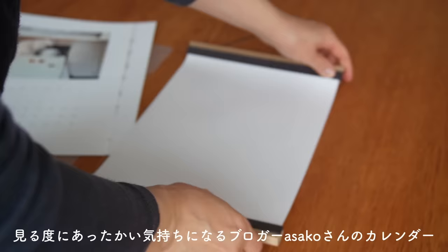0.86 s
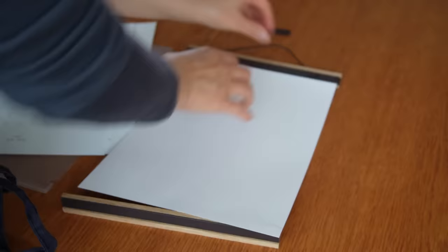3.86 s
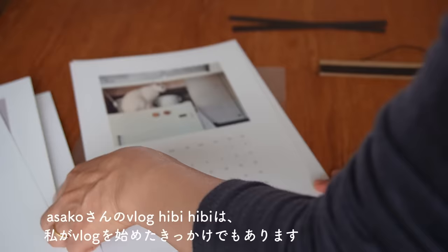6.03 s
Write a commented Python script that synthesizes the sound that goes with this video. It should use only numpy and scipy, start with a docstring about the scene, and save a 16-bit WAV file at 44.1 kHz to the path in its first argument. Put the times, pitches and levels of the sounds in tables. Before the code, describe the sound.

Paper sheets rustle, snap and slide on a wooden table while thin wooden bars knock against it, over a faint hum.

```python
"""A wooden table in a small, fairly live room; one microphone close by, an appliance humming faintly.
Calendar sheets are sorted and fitted between the thin wooden bars of a hanging frame. First the bars
drag and knock on the table; weight thuds down near 1 s and again at 3 s, with sheets brushing between.
From about 3 to 6 s the paper snaps as it flexes and crinkles in the grip, among further knocks.
In the last three seconds loose sheets slide across the table, edges scrape and a finger judders."""
import sys
import numpy as np
from scipy import signal
from scipy.fft import rfft, irfft, next_fast_len
from scipy.io import wavfile

SR = 44100
rng = np.random.default_rng(int(sys.argv[2]) if len(sys.argv) > 2 else 0)


def dump(signal):
    """Clip the signal to [-1, 1] and save it as 16-bit WAV at the path in sys.argv[1]."""
    limited = np.clip(np.atleast_2d(signal).T, -1, 1)
    pcm = np.round(limited * 32767).astype(np.int16)
    wavfile.write(sys.argv[1], SR, pcm)


N = 408366
TIME = np.arange(N) / SR
HIT_TIME = TIME[:SR // 10]
CUTOFF_HZ = 16000


def from_db(db):
    """Decibels to gain."""
    return 10 ** (np.asarray(db) / 20)


def rms_one(x):
    """Scale to unit rms."""
    return x / np.sqrt(np.mean(x ** 2) + 1e-20)


def at_hz(points, hz):
    """Read a table on a log-frequency axis."""
    freq_hz, value = np.transpose(points)
    return np.interp(np.log(hz + 1e-9), np.log(freq_hz), value)


def coloured(x, spectrum, unit_hz=1):
    """Give a signal a spectrum, at unit rms."""
    size = next_fast_len(len(x))
    hz = np.arange(size // 2 + 1) * SR / size
    gain = from_db(at_hz(spectrum, hz / unit_hz))
    return rms_one(irfft(rfft(x, size) * gain, size)[:len(x)])


def drift(per_s, size=N):
    """A randomly wandering curve of unit rms."""
    return rms_one(np.interp(TIME[:size] * per_s, np.arange(4096), rng.standard_normal(4096)))


def cut(x, hz, kind, order=2):
    """Low- or high-pass."""
    return signal.sosfilt(signal.butter(order, np.clip(hz, 10, .45 * SR), kind, fs=SR, output="sos"), x)


def resonance(x, hz, t60):
    """A two-pole resonance with gain 1 at its peak."""
    radius = np.exp(-np.log(1000) / (t60 * SR))
    feedback = [1, -2 * radius * np.cos(2 * np.pi * hz / SR), radius ** 2]
    return signal.lfilter(np.array([1, 0, -1]) * (1 - radius ** 2) / 2, feedback, x)


# Room air at the microphone: freq_hz, relative_db
AIR_SPECTRUM = [(25, -17.5), (45, -9), (85, -4.5), (180, -1.5), (400, -2.5), (620, -3), (850, -11),
                (1600, -15), (1900, -11.5), (2150, -23.5), (2500, -20.5), (4000, -29), (7000, -34),
                (15000, -33)]
# Tones of the appliance: pitch_hz, level_db
HUM_TONES = [(82, -72), (328.6, -64.5), (532.9, -80.5)]


def background(air_db=-56.5, waver_db=2.5, waver_rad=.7):
    """Room air and an appliance hum that wavers in pitch and level."""
    hum = np.zeros(N)
    for hz, level_db in HUM_TONES:
        amplitude = np.sqrt(2) * from_db(level_db + waver_db * drift(1.7))
        hum += amplitude * np.sin(2 * np.pi * hz * TIME + waver_rad * drift(5))
    return hum + from_db(air_db) * coloured(rng.standard_normal(N), AIR_SPECTRUM)


# Reverberation of the small room: freq_hz, t60_s, relative_db
ROOM_DECAY = [(102, 0.3, 8.5), (300, 0.45, 3.5), (696, 0.38, 1.5), (1200, 0.44, 2), (2000, 0.38, -0.5),
              (4500, 0.5, -4), (8000, 0.18, -0.5), (14100, 0.37, 3)]


def room(x, build_s, echo_s, echo_gain):
    """The room answers with one near echo and a diffuse tail, each band dying at its own rate."""
    t, table = TIME[:SR], np.array(ROOM_DECAY)
    edges_hz = np.geomspace(50, 18000, 15)
    tail = np.zeros(SR)
    for low, high in zip(edges_hz, edges_hz[1:]):
        bandpass = signal.butter(2, [low, high], "band", fs=SR, output="sos")
        band = signal.sosfilt(bandpass, rng.standard_normal(SR))
        hz = np.sqrt(low * high)
        t60, db = at_hz(table[:, [0, 1]], hz), at_hz(table[:, [0, 2]], hz)
        tail += band * from_db(db) * np.exp(-np.log(1000) * t / t60)
    tail *= 1 - np.exp(-t / build_s)
    tail *= from_db(-1.5) / np.linalg.norm(tail)
    tail[int(echo_s * SR)] += echo_gain
    return signal.fftconvolve(x, tail)[:N]


def friction(grains_per_s, grain_share, size):
    """Fibres catch and let go: grains on smooth noise."""
    grains = (rng.random(size) < grains_per_s / SR) * rng.standard_normal(size)
    return grain_share * rms_one(grains) + rng.standard_normal(size)


# Hiss of paper fibres, close up: freq_hz, relative_db
FIBRE_SPECTRUM = [(200, -8.5), (1000, -4), (1800, 1.5), (2800, 0.5), (4800, 0.5), (6200, -0.5),
                  (9000, -4.5), (13000, -2.5), (16000, -10.5)]


def fibre_hiss(size=SR, count=4, shift_db=7, shifts_per_s=14):
    """Hiss whose colour keeps shifting, since every lie of the sheet favours other frequencies."""
    grid_hz = np.geomspace(200, 16000, 40)
    colours = []
    for offsets_db in rng.normal(0, 3.6, (count, len(grid_hz))):
        spectrum = np.c_[grid_hz, at_hz(FIBRE_SPECTRUM, grid_hz) + offsets_db]
        colours.append(coloured(friction(grains_per_s=1500, grain_share=0.74, size=size), spectrum))
    shares = from_db([shift_db * drift(shifts_per_s, size) for _ in colours])
    return np.sum(shares * colours, axis=0) / np.linalg.norm(shares, axis=0)


# Broad resonance of a rubbed surface: pitch_ratio, relative_db
RUB_SPECTRUM = [(.15, -48), (.45, -23), (.72, -11), (.88, -5), (1, 0), (1.14, -5), (1.4, -10), (1.9, -21),
                (4, -50), (12, -82)]


def rub(hz, size=SR, grains_per_cycle=0.45):
    """A rubbed surface: a low drag judders coarsely, a high swish is fine-grained."""
    return coloured(friction(grains_per_cycle * hz, grain_share=1.0, size=size), RUB_SPECTRUM, hz)


def slide(peak_s, level_db, fall_s, hz, hiss_db, rise_share):
    """One short slide swells and fades with its speed; hiss_db is set against the rub."""
    out = np.zeros(N)
    start = int(np.clip(peak_s * SR - SR / 2, 0, N - SR))
    t = TIME[start:start + SR] - peak_s
    width_s = np.where(t < 0, rise_share * fall_s, fall_s)
    speed = np.exp(-(t / width_s) ** 2)
    out[start:start + SR] = from_db(level_db) * speed * (rub(hz) + from_db(hiss_db) * fibre_hiss())
    return out


# Sheet brushing over sheet: peak_s, relative_db, fall_s, pitch_hz, hiss_db
SHEET_SWISHES = [ (0.667, -51, 0.043, 1940, -1), (0.825, -47.5, 0.12, 1350, 1.5),
                 (1.925, -47.5, 0.034, 2800, 1), (2.0, -41, 0.052, 4300, -2.5),
                 (2.18, -62, 0.061, 2530, -1.5), (2.68, -58, 0.038, 990, 0.5),
                 (2.925, -44.5, 0.074, 2000, -3), (2.987, -31.5, 0.016, 1930, 3),
                 (3.026, -42, 0.058, 3730, -13.5), (4.062, -50.5, 0.02, 2700, -8.5),
                 (4.107, -50, 0.018, 2430, -10), (5.73, -37.5, 0.015, 12500, 2)]


def swishes():
    """One sheet brushes briefly over another, swelling gently."""
    return sum(slide(*row, rise_share=0.72) for row in SHEET_SWISHES)


# Bars and fingertips dragging: peak_s, relative_db, fall_s, pitch_hz
SHORT_DRAGS = [ (0.01, -29.5, 0.021, 529), (0.016, -39, 0.067, 1100), (0.16, -47, 0.11, 556),
               (0.242, -32, 0.007, 1230), (1.126, -28.5, 0.015, 2260), (4.47, -54, 0.025, 1060),
               (4.734, -50.5, 0.088, 231), (4.933, -44, 0.013, 2930), (5.14, -35, 0.054, 1367),
               (6.898, -49, 0.078, 1610), (6.955, -39.5, 0.061, 980), (8.294, -36, 0.022, 4770),
               (8.292, -39, 0.019, 8500), (9.18, -63.5, 0.065, 3260)]


def drags():
    """Bars and fingertips catch abruptly, drag and slow down, with hardly any hiss."""
    return sum(slide(*row, hiss_db=-21, rise_share=0.37) for row in SHORT_DRAGS)


# Sheet edges scraping: peak_s, relative_db, half_length_s, pitch_hz
EDGE_SCRAPES = [ (4.392, -65, 0.062, 1990), (4.392, -64.5, 0.073, 3230), (6.425, -67, 0.029, 7930),
                (6.56, -58, 0.037, 5170), (7.235, -53, .025, 6450), (7.321, -47, 0.029, 4940),
                (7.542, -58.5, 0.16, 5010), (7.7, -46.5, 0.019, 7930), (8.303, -38.5, .013, 4080),
                (8.441, -53, 0.058, 4400), (8.497, -49.5, 0.047, 6840), (8.636, -57, 0.033, 4800)]


def scrapes(ring_cycles=19):
    """A dragged edge catches and sings for a moment in one narrow resonance."""
    out = np.zeros(N)
    for peak_s, level_db, half_length_s, hz in EDGE_SCRAPES:
        near = abs(TIME - peak_s) < np.pi * half_length_s
        tone = rms_one(resonance(rub(hz, size=near.sum()), hz, ring_cycles / hz))
        swell = np.exp(-((TIME[near] - peak_s) / half_length_s) ** 2)
        out[near] += from_db(level_db) * swell * tone
    return out


def crackle(size, ticks_per_s=50, spread_db=5.5, pitch_hz=5400):
    """Sliding edges catch now and then: many tiny ticks, a few larger ones."""
    catches = rng.random(size) < ticks_per_s / SR
    strength = from_db(spread_db * np.minimum(rng.exponential(1, size), np.pi))
    return rms_one(signal.fftconvolve(catches * strength, buckle(pitch_hz)[0])[:size])


# Level curve of loose sheets crossing the table in several pulls: time_s, relative_db
SHEET_PULLS = [ (6.1, -69), (6.138, -64), (6.422, -58), (6.506, -62), (6.546, -55), (6.694, -78.5),
               (6.83, -75), (7.02, -43.5), (7.138, -58), (7.24, -46.5), (7.285, -45.5), (7.35, -39.5),
               (7.424, -62), (7.53, -49), (7.63, -62), (7.705, -45), (7.77, -57.5), (8.036, -55.5),
               (8.074, -60.5), (8.154, -56.5), (8.37, -54.5), (8.502, -48), (8.672, -61.5), (8.8, -60),
               (8.915, -74), (8.962, -56.5), (9.048, -76)]


def long_slide(hiss_db=0.5, rub_db=-16.5, crackle_db=-9, fade_s=0.042):
    """Sheets glide on without a break: fibre hiss over a broad resonance and crackle."""
    times_s, levels_db = np.transpose(SHEET_PULLS)
    t = TIME[TIME >= times_s[0]]
    fade = np.exp(-np.maximum(t - times_s[-1], 0) / fade_s)
    speed = from_db(np.interp(t, times_s, levels_db)) * fade
    sheets = from_db(hiss_db) * cut(fibre_hiss(size=len(t), count=8), 1500, "high")
    sheets += from_db(rub_db) * rub(hz=3800, size=len(t))
    sheets += from_db(crackle_db) * crackle(len(t))
    return np.r_[np.zeros(N - len(t)), speed * sheets]


def click(t60):
    """One contact in two rows: with brief chatter at the microphone, plain as it enters the room."""
    chatter = rng.standard_normal(len(HIT_TIME)) * np.exp(-np.log(1000) * HIT_TIME / t60)
    impulse = 1.0 * (HIT_TIME == 0)
    return np.array([impulse + chatter / np.linalg.norm(chatter), impulse])


def dispersed(x, hz, cycles=2.0, count=3):
    """Bending waves arrive smeared, so a hit swells over its first cycles; its spectrum is kept."""
    for _ in range(count):
        x = x - 2 * resonance(x, hz, cycles / hz)
    return x


def add_hit(out, start_s, hit, level_db, room_db):
    """Add a hit to the direct sound and the room feed; its level is its energy spread over 5 ms."""
    rms = np.sqrt(np.sum(hit ** 2, axis=1, keepdims=True) / (.005 * SR))
    start = int(start_s * SR)
    out[:, start:start + len(HIT_TIME)] += hit / rms * from_db([[level_db], [level_db + room_db]])


def buckle(hz, low_share=.5, high_share=2.2, ring_gain=2.2, ring_cycles=6.0):
    """A sheet buckles: a crack in a band around its pitch, ringing only a few cycles."""
    crack = cut(click(t60=0.0089), high_share * hz, "low")
    crack = cut(crack, low_share * hz, "high")
    return dispersed(crack + ring_gain * resonance(crack, hz, ring_cycles / hz), hz)


PAPER_ROOM_DB = -3.5
# Paper crinkling in the grip: start_s, length_s, tick_level_db, pitch_hz
GRIP_CRINKLES = [(4.725, .012, -49.5, 10100), (4.895, 0.064, -60.5, 7000), (5.033, 0.05, -42.5, 6430),
                 (5.711, .03, -41, 7450), (6.275, 0.071, -56.5, 3380)]


def crinkles(ticks_per_s=120, spread_db=2.5):
    """A gripped sheet gives way in an uneven run of tiny buckles, each with its own size and pitch."""
    out = np.zeros((2, N))
    for start_s, length_s, level_db, hz in GRIP_CRINKLES:
        count = int(length_s * ticks_per_s) + 1
        for k, (late, size, octaves) in enumerate(rng.uniform(-0.89, 1, (count, 3))):
            tick = buckle(min(hz * 2 ** octaves, CUTOFF_HZ))
            tick_s = start_s + length_s * (k + .5 + late / 2) / count
            add_hit(out, tick_s, tick, level_db + spread_db * size, PAPER_ROOM_DB)
    return out


# Paper flexing and flicking: start_s, level_db, pitch_hz
PAPER_SNAPS = [ (2.8454, -37.5, 7500), (3.3671, -29, 3400), (3.6282, -19.5, 3920), (3.7113, -28.5, 4500),
               (4.9972, -47.5, 2590), (5.0299, -31.5, 7400), (5.0536, -31.5, 3800), (5.0896, -37, 2330),
               (5.1255, -32, 6740), (5.239, -33, 4000), (5.534, -45, 2110), (5.6611, -37, 4650),
               (5.713, -28, 4850), (6.0767, -36, 4040), (7.365, -38, 3740)]


def snaps(usual_db=-30, after_s=0.009, after_db=-17, after_ratio=3.2):
    """A flexed sheet buckles once, with a smaller, higher buckle just behind."""
    out = np.zeros((2, N))
    for start_s, level_db, hz in PAPER_SNAPS:
        # A stronger snap moves more of the sheet: it reaches lower and fills the room more.
        excess_db = level_db - usual_db
        low_share = min(0.16 * from_db(-excess_db), .5)
        room_db = PAPER_ROOM_DB + .25 * excess_db
        add_hit(out, start_s, buckle(hz, low_share), level_db, room_db)
        after = buckle(min(after_ratio * hz, CUTOFF_HZ))
        add_hit(out, start_s + after_s, after, level_db + after_db, room_db)
    return out


# Resonances of the bars and table top: pitch_hz, t60_s, gain_db
WOOD_MODES = [(383.8, 0.078, 2), (543, 0.21, -5), (826, 0.036, -6.5), (1240, 0.012, 4.5),
              (1940, 0.0093, -1), (3400, 0.021, -5.5)]


def blow_on_wood(hz, t60, bright_hz, ring_gain=0.56, ring_to_room=0.31, low_hz=332):
    """A softer contact is duller, and the free length of the wood rings at its own pitch."""
    blow = cut(click(t60=0.021), bright_hz, "low")
    blow = cut(blow, low_hz, "high")
    modes = sum(from_db(db) * resonance(blow, mode_hz, decay_s) for mode_hz, decay_s, db in WOOD_MODES)
    ring = ring_gain * hz * t60 * resonance(blow, hz, t60) * [[1], [ring_to_room]]
    return dispersed(blow + modes + ring, bright_hz, count=2)


# Weight coming down on the table top: start_s, level_db
TABLE_THUDS = [(0.931, -18), (1.121, -23.5), (1.132, -31), (2.9981, -34), (3.043, -29.5), (3.093, -35.5)]


def thuds(puff_hz=75.6, puff_rise_s=.035, puff_db=-26.5):
    """The table takes a dull blow, then the hand presses a soft, low puff of air out of the stack."""
    out = np.zeros((2, N))
    puff = coloured(rng.standard_normal(N), RUB_SPECTRUM, puff_hz)
    for start_s, level_db in TABLE_THUDS:
        add_hit(out, start_s, blow_on_wood(hz=900, t60=0.0039, bright_hz=1780), level_db, room_db=1.5)
        age = np.maximum(TIME - start_s, 0) / puff_rise_s
        out[0] += from_db(level_db + puff_db) * age * np.exp(1 - age) * puff
    return out


# Sharp knocks and ticks, close by (bars on wood, a paper snap, a juddering finger):
# start_s, level_db, pitch_hz, t60_s, brightness_hz
KNOCKS_AND_TICKS = [ (0.487, -12, 1297, 0.026, 1050), (0.5294, -20, 1144, 0.013, 940),
                    (0.5391, -25.5, 1040, 0.0088, 900), (0.6712, -9.5, 1140, 0.0058, 3000),
                    (0.8911, -25, 1160, 0.033, 1500), (0.9268, -11, 2270, 0.003, 3770),
                    (1.1263, -19.5, 2300, 0.0042, 2250), (2.4568, -33.5, 1200, 0.009, 5170),
                    (2.466, -34, 1080, 0.0055, 4100), (2.5432, -31, 1880, 0.0061, 2000),
                    (2.7438, -44, 990, 0.0018, 8000), (2.99, -9.5, 1920, 0.017, 3820),
                    (4.7504, -37.5, 2000, 0.01, 3000), (5.0289, -24, 2200, 0.0023, 3520),
                    (5.1256, -14, 2430, 0.0018, 3430), (5.13, -21.5, 1410, 0.024, 2490),
                    (5.731, -30.5, 1050, 0.001, 10850), (6.2705, -41.5, 1770, 0.0054, 3000),
                    (6.997, -31, 1080, 0.02, 1330), (7.041, -29, 1090, 0.0061, 5030)]


def knocks_and_ticks(usual_room_db=-7, usual_bright_hz=3000, room_db_per_octave=2.5):
    """Each sharp contact rings briefly; a harder one throws more of its sound into the room."""
    out = np.zeros((2, N))
    for start_s, level_db, hz, t60, bright_hz in KNOCKS_AND_TICKS:
        room_db = usual_room_db + room_db_per_octave * np.log2(bright_hz / usual_bright_hz)
        add_hit(out, start_s, blow_on_wood(hz, t60, bright_hz), level_db, room_db)
    return out


def scene(unevenness_db=1.2):
    """Everything on the table from close by, in mono, with the room behind it."""
    direct, to_room = knocks_and_ticks() + thuds() + snaps() + crinkles()
    slides = drags() + swishes() + long_slide() + scrapes()
    rubbing = slides * from_db(unevenness_db * drift(50))
    reverb = room(to_room + from_db(-6.0) * rubbing, build_s=0.0018, echo_s=0.016, echo_gain=0.069)
    return (direct + from_db(-0.95) * rubbing + reverb + background())[None]


def record(dry):
    """The microphone chain rounds the highest peaks and cuts the top of the treble."""
    ceiling = .8
    lowpass = signal.ellip(10, .1, 80, CUTOFF_HZ, fs=SR, output="sos")
    return signal.sosfilt(lowpass, ceiling * np.tanh(dry / ceiling))


dry = scene()
out = record(dry)
dump(out)
```